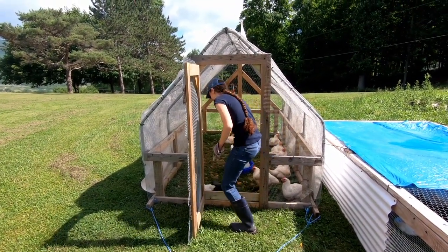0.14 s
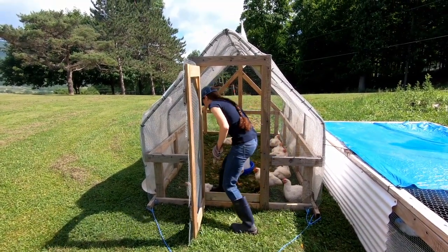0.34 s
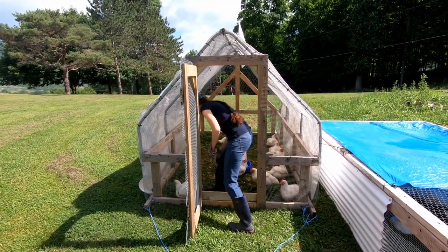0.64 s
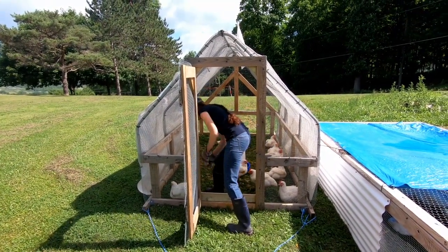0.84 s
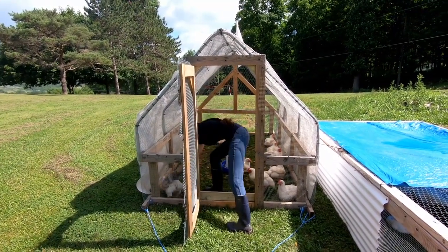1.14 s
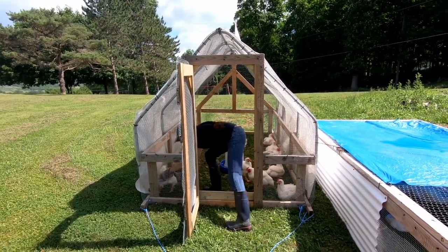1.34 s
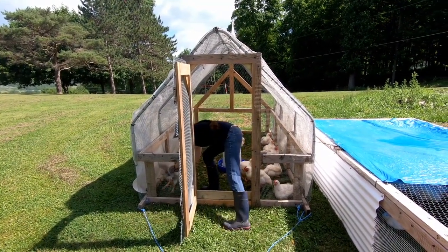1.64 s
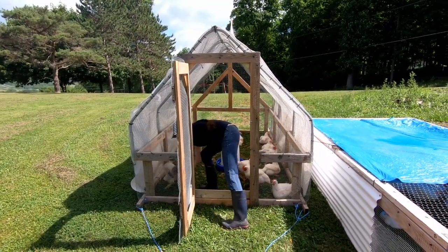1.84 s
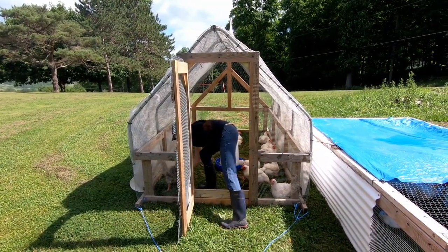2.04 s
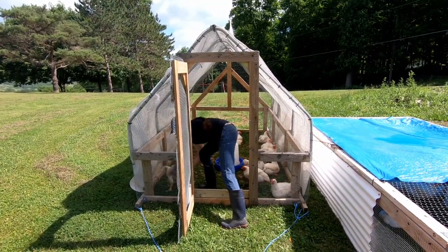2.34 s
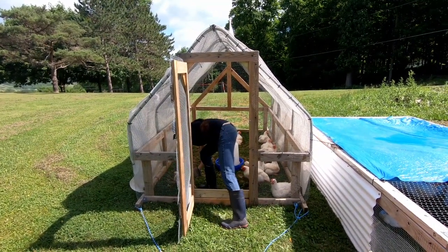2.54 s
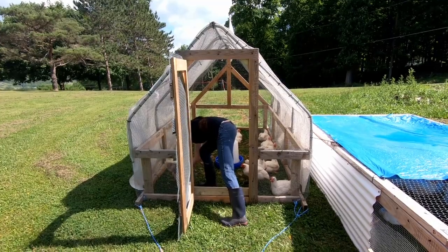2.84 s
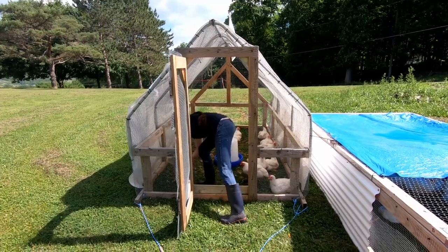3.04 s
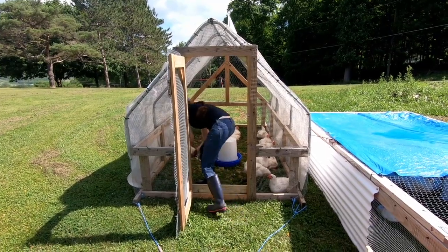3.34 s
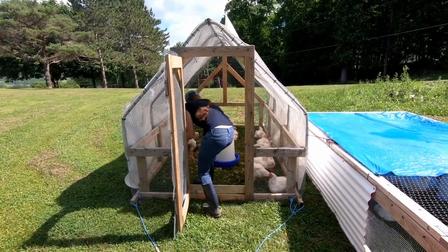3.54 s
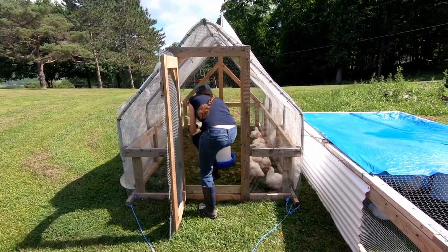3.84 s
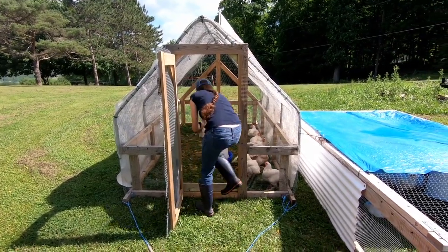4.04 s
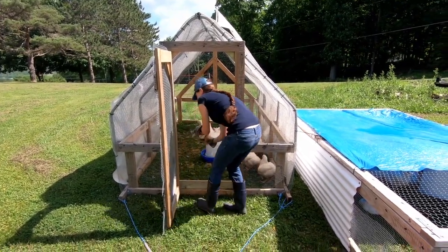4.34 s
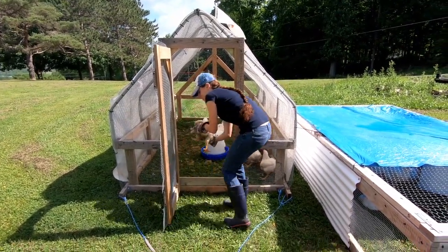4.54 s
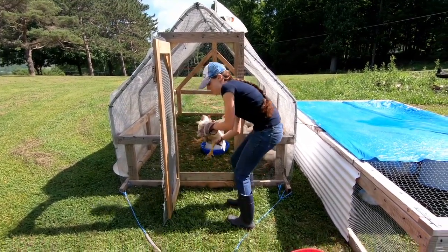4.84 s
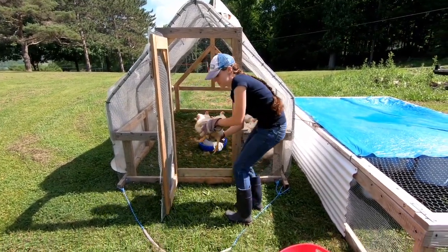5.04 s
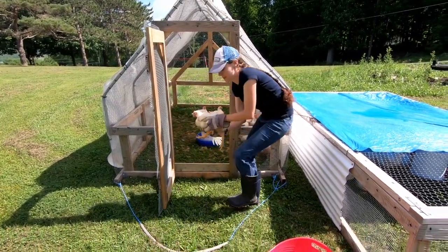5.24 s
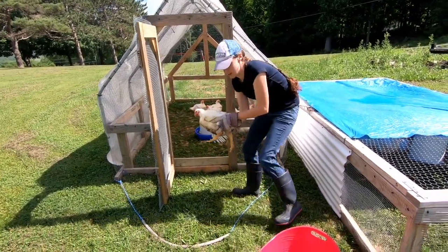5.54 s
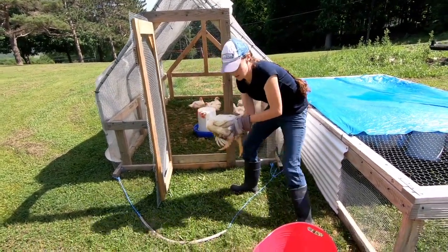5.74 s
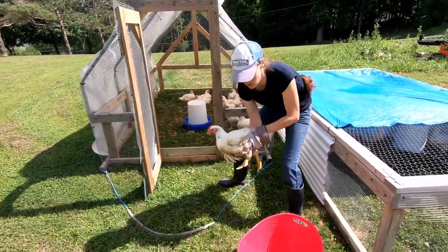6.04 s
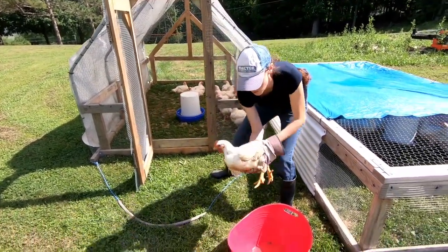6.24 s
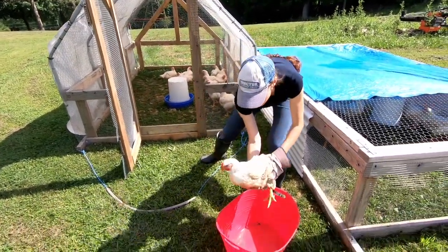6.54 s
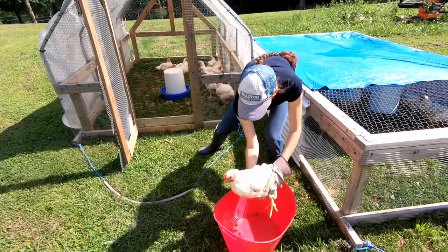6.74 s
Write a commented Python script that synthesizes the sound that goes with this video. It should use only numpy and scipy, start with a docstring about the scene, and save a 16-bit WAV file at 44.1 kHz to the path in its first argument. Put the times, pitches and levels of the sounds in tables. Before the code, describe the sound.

Outdoors by a pen, wind rumbles on the microphone over a few dull knocks and faint peeps. Then a nearby chicken starts squawking, hoarse and shrill, in rapid short cries while straw rustles. Past the middle it flaps briefly and a plastic feeder is bumped. The wind drops, the squawks grow louder and more spaced out, and a distant sparrow trills in the trees.

```python
"""Catching a chicken in a hoop pen.

On a lawn, close to the microphone, a young chicken is caught and carried out: the strained membranes
of its syrinx squawk harshly, its wings beat, straw rustles, boots and a feeder knock about.
Farther off the flock peeps and a sparrow trills in the trees.
A breeze buffets the microphone until it drops."""
import sys
import numpy as np
from scipy import signal
from scipy.fft import rfft, irfft, next_fast_len
from scipy.io import wavfile
from scipy.ndimage import uniform_filter1d, map_coordinates

SR = 44100
rng = np.random.default_rng(int(sys.argv[2]) if len(sys.argv) > 2 else 0)


def generate_wav(signal):
    """Clip the signal to [-1, 1] and save it as 16-bit WAV at the path in sys.argv[1]."""
    frames = np.transpose(np.atleast_2d(signal))
    scaled = np.clip(frames, -1, 1) * 32767
    pcm = np.round(scaled).astype(np.int16)
    wavfile.write(sys.argv[1], SR, pcm)


N = 304290
MID_HZ = 800  # the voice's resting pitch, at which the throat resonances are unstretched


def amp(db):
    return 10 ** (np.asarray(db) / 20)


def unit(x):
    return x / np.sqrt(np.mean(x ** 2) + 1e-20)


def along(points, hz):
    """Read (Hz, value) points on a log frequency axis."""
    freqs, values = np.transpose(points)
    return np.interp(np.log(hz + 1), np.log(freqs + 1), values)


def curve(points):
    """One value per sample from (s, value) points."""
    times, values = np.transpose(points)
    return np.interp(np.arange(N) / SR, times, values)


def wobble(rate):
    """A smooth random curve, rate knots a second."""
    return map_coordinates(rng.standard_normal(int(N * rate / SR) + 4), [np.arange(N) * rate / SR])


def filtered(x, response):
    """x times a response of frequency."""
    size = next_fast_len(N + SR // 2)
    return irfft(rfft(x, size) * response(np.fft.rfftfreq(size, 1 / SR)), size)[..., :N]


def coloured(x, points):
    """x through a spectrum of (Hz, dB) points."""
    return filtered(x, lambda hz: amp(along(points, hz)))


def noise(spectrum):
    """Noise of rms 1, coloured by (Hz, dB) points."""
    return unit(coloured(rng.standard_normal(N), spectrum))


def stereo_noise(spectrum, width):
    """Stereo noise of rms 1; width is side over mid."""
    mid, side = coloured(rng.standard_normal((2, N)), spectrum)
    return unit(np.array([mid + width * side, mid - width * side]))


def steady(x, size=400):
    """x with its running rms held at 1."""
    return x / np.sqrt(np.abs(uniform_filter1d(uniform_filter1d(x * x, size), size)) + 1e-12)


def add(track, start_s, sound):
    """Mix a sound into a track."""
    i = max(0, round(start_s * SR))
    track[i:i + len(sound)] += sound[:max(0, N - i)]


def bump(hz, centre_hz, width_hz):
    """A resonance peak of height 1."""
    return 1 / (1 + (2 * (hz - centre_hz) / width_hz) ** 2)


def patchy(x, depth_db, frames):
    """x with random patches of gain across time and frequency."""
    spectra = signal.stft(x, nperseg=512)[2]
    patches = uniform_filter1d(uniform_filter1d(rng.standard_normal(spectra.shape), 5, 0), frames, 1)
    return signal.istft(spectra * amp(depth_db * unit(patches)), nperseg=512)[1][:N]


def breeze(buffet_db, leaves_db, fade_db_per_s, lean_db):
    """Eddies hit each microphone port separately; far trees hiss, ever less as the breeze drops."""
    # strength of the gusts at the microphone: time_s, relative_db
    gusts = [(0.0, -29.5), (0.46, -25.5), (1.6, -20), (2.17, -27.5), (2.96, -26), (3.12, -39.5),
             (3.82, -24.5), (4.1, -38), (4.32, -35), (4.88, -94), (5.6, -48.5), (6.55, -39), (6.9, -48)]
    # spectrum of the wind on the ports: frequency_hz, gain_db
    rumble = [(20, -5.5), (48, 6), (90, 1.5), (150, -6.5), (220, -15.5), (390, -31), (650, -93)]
    # spectrum of the distant leaves: frequency_hz, gain_db
    hiss = [(200, 8.5), (450, -8), (800, -7), (1400, -6.5), (2700, -3), (4600, -11), (6000, -23),
            (11000, -38), (14000, -93)]
    eddies = amp(3.6 * np.array([wobble(22), wobble(22)]))
    buffet = amp(curve(gusts) + buffet_db) * unit(eddies * stereo_noise(rumble, width=.9))
    sway = amp(leaves_db - fade_db_per_s * np.arange(N) / SR + wobble(3.281))
    return buffet * amp([[lean_db], [-lean_db]]) + sway * stereo_noise(hiss, width=.34)


def flock(gain_db, waver):
    """Thin, wavering peeps of the other young birds, some way off."""
    # gliding peeps: start_s, length_s, start_hz, end_hz, relative_db
    peeps = [(0.457, 0.061, 2800, 2220, -58), (0.503, 0.026, 1400, 740, -51.5),
             (0.566, 0.016, 780, 1150, -51), (0.572, 0.062, 2350, 2100, -54), (.91, 0.11, 3130, 3560, -66),
             (1.036, 0.087, 3770, 3590, -60.5), (0.022, 0.0685, 2650, 2335, -54),
             (5.94, .068, 2284, 2136, -55.5), (6.618, 0.079, 2110, 2980, -60)]
    out = np.zeros(N)
    for start, length, start_hz, end_hz, db in peeps:
        progress = np.linspace(0, 1, int(length * SR))
        glide_hz = start_hz + (end_hz - start_hz) * np.sin(np.pi * progress / 2)
        hz = glide_hz * (1 + waver * wobble(400)[:len(progress)])
        swell = amp(db + gain_db) * np.sin(np.pi * progress)
        add(out, start, swell * np.sin(2 * np.pi * np.cumsum(hz) / SR))
    return out * amp(4 * wobble(120))


def sparrow(level_db):
    """One hooked whistle from the trees, repeated evenly and never quite alike."""
    # runs of the trill: start_s, end_s, interval_s
    trills = [(.073, .17, .091), (4.765, 5.96, .0567), (6.416, 6.89, .0587)]
    # shape of one whistle: from_centre_s, pitch_hz, relative_db
    note = [(-.018, 4700, -12.5), (-.013, 5800, -10), (-.006, 7460, -8.5), (-.002, 6030, 4),
            (.004, 5750, -21.5), (.016, 6330, -26)]
    offsets, hz, db = np.transpose(note)
    out, t = np.zeros(N), np.arange(offsets[0], offsets[-1], 1 / SR)
    for start, end, interval in trills:
        for centre in np.arange(start, end, interval):
            detune = 1 + .0035 * rng.normal()
            phase = 2 * np.pi * np.cumsum(np.interp(t, offsets, hz)) * detune / SR
            swell = amp(level_db + rng.normal() + np.interp(t, offsets, db))
            add(out, centre + offsets[0], swell * np.sin(phase))
    return out


def knocks(clack_t60, thud_t60):
    """Dull contacts of boots and wood on turf: a clack over a low thud."""
    # footfalls and bumps against the frame: start_s, clack_db, thud_db
    contacts = [(0.304, -44.5, -17.5), (0.513, -45.5, -28.5), (0.749, -39.5, -27.5), (2.182, -32, -31),
                (4.245, -57, -18.5), (4.43, -31, -29.5)]
    clack, thud, t = np.zeros(N), np.zeros(N), np.arange(SR // 4) / SR
    for start, clack_db, thud_db in contacts:
        add(clack, start, amp(clack_db - 60 * t / clack_t60) * np.minimum(t / .002, 1))
        add(thud, start, amp(thud_db - 60 * t / thud_t60) * (1 - np.exp(-t / .0045)))
    wood = noise([(200, 2), (1200, 12), (4000, 2), (12000, -47)])
    turf = noise([(60, -8), (200, 22.5), (600, -22), (2000, -58)])
    return clack * wood + thud * turf


def straw(crackle_db, crackle_rate):
    """Dry straw rustles in uneven spurts under the birds' feet."""
    # straw and feathers stirred in the struggle: start_s, length_s, level_db
    scuffles = [(1.144, 0.56, -35.5), (1.937, 0.062, -36), (3.895, 0.56, -32)]
    # spectrum of the rustle: frequency_hz, gain_db
    rustle = [(200, -9), (900, 4.5), (2800, 2.5), (5000, -8), (9500, -20.5), (14000, -64)]
    stir = np.zeros(N)
    for start, length, db in scuffles:
        add(stir, start, amp(db) * np.sin(np.linspace(0, np.pi, int(length * SR))))
    crackle = amp(crackle_db * wobble(crackle_rate))
    return stir * unit(crackle * noise(rustle))


def syllables(arch_hz=26.99, body_arch_db=8, rasp_arch_db=6.5, attack_share=.39, release_s=.021):
    """The voice's controls arch over each syllable; tension is the unbroken pitch in Hz."""
    # syllables, often a hoarse catch and then a voiced cry, with values at the crest: start_s, length_s,
    # crest_share, pitch_hz, glide_hz_per_s, bite_hz (a resonance), roughness, body_db, rasp_db
    calls = [(1.195, .055, 0.34, 905, -3, 3040, 1.2, -38.5, -32),
             (1.347, .17, 0.57, 927, -500, 3780, 0.65, -23, -31.5),
             (1.554, .155, 0.32, 875, -600, 3500, 0.68, -23.5, -18.5),
             (1.736, .115, 0.46, 817.3, -750, 4020, 0.29, -23, -19),
             (1.991, .18, 0.22, 793, -1100, 5990, 0.6, -27.5, -19),
             (2.259, .054, 0.41, 818, -600, 3000, 0.8, -26.5, -22),
             (2.321, .08, 0.41, 800.6, 1105, 3920, 0.51, -21.5, -17),
             (2.54, .061, 0.44, 771, 2, 2430, 0.79, -38.5, -27.5),
             (2.661, .09, 0.34, 681, -4000, 2180, 0.56, -25, -18.5),
             (2.861, .17, .15, 832.2, -1500, 2930, 0.69, -24.5, -19.5),
             (3.123, 0.028, 0.44, 791, 2, 1692, 0.99, -26.5, -30.5),
             (3.142, .089, 0.42, 821, -900, 2600, 0.93, -33, -28),
             (3.206, .14, .56, 768, -1100, 3190, 0.63, -22.5, -20.5),
             (3.458, 0.0878, 0.52, 810, 4, 2990, 0.83, -23.5, -26.5),
             (3.531, .1, 0.33, 819, -300, 3500, 0.99, -33.5, -34),
             (3.613, .15, 0.63, 734.3, -1100, 2180, 0.8, -24, -22),
             (3.961, .1, 0.46, 859, 7, 2500, 0.85, -32.5, -25),
             (4.079, .1, .52, 790, -300, 2250, .84, -29, -24),
             (4.19, 0.14, .5, 790, -1800, 3350, 0.72, -24, -25),
             (4.322, .06, 0.33, 693.6, -1, 3500, 0.69, -28.5, -48),
             (4.424, .061, 0.46, 646.2, 1105, 1870, 0.82, -36.5, -38.5),
             (4.491, .145, .36, 818.6, -200, 2500, 0.69, -25.5, -19),
             (4.626, .125, .62, 736, -1500, 2450, 0.77, -24, -20.5),
             (4.901, 0.0356, 0.37, 777, 1507.5, 1540, 0.77, -23.5, -29.5),
             (4.918, .088, 0.55, 585, -550, 3528, 0.27, -25, -19),
             (4.989, .095, 0.31, 739, -100, 2800, 0.39, -18, -18),
             (5.334, .099, 0.43, 809.7, -400, 2310, 0.82, -19.5, -26.5),
             (5.419, .135, 0.37, 787.3, -330, 1560, 0.49, -11.5, -26),
             (5.537, .045, 0.43, 995, -8000, 1010, 0.58, -30, -39),
             (5.99, 0.1146, 0.57, 798.7, -400, 2010, 0.76, -17.5, -22),
             (6.058, 0.3008, .58, 806, -74, 2040, 0.47, -11, -22.5),
             (6.342, .048, 0.34, 867, -500, 890, 0.52, -30.5, -35)]
    tension, bite = np.full((2, N), float(MID_HZ))
    sag, rough, effort, body, rasp = np.zeros((5, N))
    for start, length, crest, hz, glide, bite_hz, roughness, body_db, rasp_db in calls:
        t = np.arange(int(length * SR)) / SR
        span = slice(round(start * SR), round(start * SR) + len(t))
        past_crest = t / length - crest
        slack = (2 * past_crest) ** 2  # 1 at half a length from the crest
        tension[span] = hz + glide * length * past_crest - arch_hz * slack
        bite[span] = bite_hz * tension[span] / hz
        sag[span] = np.clip(past_crest / (1 - crest), 0, 1)
        # the membranes are least steady as they start and away from the crest
        rough[span] = np.clip(roughness * (1 - .3 * past_crest + .25 * slack), 0, 1)
        effort[span] = np.maximum(effort[span], np.sqrt(np.sin(np.pi * t / length)))
        opening = np.minimum(t / (attack_share * crest * length), 1)
        closing = np.minimum((length - t) / release_s, 1)
        add(body, start, opening * closing * amp(body_db - body_arch_db * slack))
        rasp_slack = (2 * (past_crest + .029)) ** 2  # the rasp crests a little earlier
        add(rasp, start, opening * closing ** 2 * amp(rasp_db - rasp_arch_db * rasp_slack))
    rough = np.abs(uniform_filter1d(rough, size=300))  # the membranes cannot change at once
    return tension, bite, sag, rough, effort, body, rasp


def voice_cracks(tension, rough, length_s=.036, rough_rise=.249):
    """Pitch and roughness jump where the voice cracks as the air runs out, and once as a scoop at the start of
    a call."""
    # cracks in the voice: start_s, jump_hz
    breaks = [(1.825, 131), (2.125, 330.3), (2.38, 69.9), (2.978, 219.8), (5.325, 328.9)]
    pitch, hoarse = tension.copy(), rough.copy()
    crack = np.clip(4 * np.sin(np.linspace(0, np.pi, int(length_s * SR))), 0, 1)
    for start, jump_hz in breaks:
        add(pitch, start, jump_hz * crack)
        add(hoarse, start, rough_rise * crack)
    return pitch, np.clip(hoarse, 0, 1)


def syrinx(pitch, rough, jitter, shake, flutter, db_per_octave, count=19):
    """A harmonic cry; under strain a slower membrane flutter adds sidebands, then it breaks into noise."""
    unsteady = 1 + jitter * rough ** 3 * wobble(220) + .022 * rough ** 1.5 * wobble(55)
    phase = 2 * np.pi * np.cumsum(pitch * unsteady) / SR
    beat = np.sin(phase / 4 + 2 * rough * wobble(90))  # flutter at a quarter of the pitch
    phase += rough * (shake * rough * wobble(500) + flutter * beat)
    harmonics = np.arange(1, count + 1)
    lag = rng.uniform(0, 2 * np.pi, (count, 1))  # ringing in the throat spreads each pulse
    cry = amp(db_per_octave * np.log2(harmonics)) @ np.cos(harmonics[:, None] * phase + lag)
    cry *= 1 + rough * (.75 * beat + .5 * wobble(350))
    puffs = rng.standard_normal(N) * (1 + np.cos(phase))
    air = coloured(puffs, [(2400, 0), (12800, -7)])
    return unit(cry) + rough ** 2 * unit(air)


def throat(source, tension, bite, sag, ring_db=7, sag_db=18, bite_db=5.5):
    """In the pen the resonances follow the tension; with the beak wide only the bite moves."""
    # throat colour in the pen: frequency_hz, gain_db
    penned = [(350, -27.5), (500, -24.5), (650, 9.5), (850, 4.5), (1150, -0.5), (1600, 3.5), (2000, -4),
              (2400, 5), (3200, 0), (4400, -13.5), (6600, -19), (8000, -25), (9800, -21.5), (12000, -40.5)]
    # throat colour held up with the beak wide: frequency_hz, gain_db
    wide = [(350, -18), (520, -9.5), (650, 2), (800, -3.5), (1050, -7), (1600, 11), (2000, 3), (3100, -2),
            (4000, -10), (5100, -10), (7200, -12), (8400, -20.5), (10200, -19.5), (12000, -44.5)]
    # how far the beak opens once the bird is held up: time_s, gape_share
    beak = [(4.6, 0.08), (5.35, 1)]
    hz, t, spectra = signal.stft(source, SR, nperseg=512, noverlap=384)
    hz = hz[:, None]
    controls = tension, bite, sag, np.clip(curve(beak), 0, 1)
    tension, bite, sag, gape = [np.interp(t, np.arange(N) / SR, c) for c in controls]
    stretched = hz * MID_HZ / tension
    narrow_db = along(penned, stretched) + ring_db * bump(stretched, 2410, 360)  # a piercing ring on top
    narrow_db += sag_db * sag * bump(hz, 1450, 190)  # opens as each syllable runs out
    colour_db = (1 - gape) * narrow_db + gape * along(wide, hz)
    colour_db += bite_db * bump(hz, bite, 350)  # shifts between syllables as the head turns
    return signal.istft(spectra * amp(colour_db), nperseg=512, noverlap=384)[1][:N]


def squawks(rasp_hz=1900, treble_hz=4400):
    """The caught bird: syrinx through throat, each syllable with its own swell and share of rasp."""
    # treble reaching the microphone as the bird is turned about, at full effort: time_s, gain_db
    turning = [(1.8, 3), (2.05, 12), (2.35, 0.5), (2.7, 14), (2.9, 3), (3.3, -1), (3.7, 10.5), (4.6, 8),
               (5, 2.5), (6.2, 3.5)]
    tension, bite, sag, rough, effort, body_gain, rasp_gain = syllables()
    pitch, rough = voice_cracks(tension, rough)
    source = syrinx(pitch, rough, jitter=.07, shake=.3, flutter=.4, db_per_octave=-3)
    voice = patchy(throat(source, tension, bite, sag), depth_db=2.6, frames=6)
    body = filtered(voice, lambda hz: 1 / (1 + (hz / rasp_hz) ** 16))
    rasp = steady(voice - body)
    treble = rasp - filtered(rasp, lambda hz: 1 / (1 + (hz / treble_hz) ** 20))
    rasp += (effort * amp(curve(turning)) - 1) * treble
    quaver = amp(2.6 * rough * wobble(100))
    return quaver * (body_gain * steady(body) + rasp_gain * rasp)


def feeder(start_s, hz, db, t60):
    """The hollow plastic feeder booms briefly when bumped."""
    out, t = np.zeros(N), np.arange(SR // 3) / SR
    swell = amp(db - 60 * t / t60) * (1 - np.exp(-t / .0084))
    add(out, start_s, swell * np.sin(2 * np.pi * hz * t))
    return out


def wings(start_s, interval_s, thump_hz, thump_db, feather_db, rise_s=.004, scatter_db=3.5, count=7):
    """One burst of wing beats, each a soft thump of air and a swish of feathers."""
    thumps, swish, t = np.zeros(N), np.zeros(N), np.arange(SR // 8) / SR
    swell = t / rise_s * np.exp(1 - t / rise_s)
    for beat_s in start_s + interval_s * np.arange(count):
        stroke = swell * amp(-scatter_db * rng.normal())
        hz = thump_hz * (1 + .083 * rng.normal())
        add(thumps, beat_s, amp(thump_db) * stroke * np.sin(2 * np.pi * hz * t))
        add(swish, beat_s, amp(feather_db) * stroke)
    return thumps + swish * noise([(100, 4.5), (900, 15), (4000, -15), (14000, -52)])


def near(x, width, cover_db, cover_t60):
    """A source just in front of the microphone; quick reflections off the pen's cover shift as it moves."""
    # imbalance of the two ports, negative to the right: frequency_hz, left_share
    lean = [(750, -0.06), (1500, -0.051)]
    t = np.arange(SR // 8) / SR
    echoes = rng.standard_normal((2, 2, len(t))) * amp(-60 * t / cover_t60) * (t > .002)
    echoes /= np.linalg.norm(echoes[0, 0])
    one, other = signal.fftconvolve(x[None, None], echoes, axes=2)[..., :N]
    turn = 2 * wobble(3)
    reflections = np.cos(turn) * one + np.sin(turn) * other

    def side_response(hz):
        return along(lean, hz) + 1j * width * (1 + (hz / 4000) ** 2) / (1 + (hz / 9000) ** 2)

    side = filtered(x, side_response)
    return np.array([x + side, x - side]) + amp(cover_db) * reflections


def yard(x):
    """Diffuse scatter from the pen and the trees, different at each port."""
    # decay of the yard's scatter: frequency_hz, t60_s
    decay = [(300, 0.53), (2000, 0.46), (10000, 1)]
    hz, t, spectra = signal.stft(rng.standard_normal((2, SR // 2)), SR, nperseg=256)
    tail = signal.istft(spectra * amp(-60 * t / along(decay, hz)[:, None]), SR, nperseg=256)[1]
    return signal.fftconvolve(x[None], tail / np.linalg.norm(tail[0]), axes=1)[:, :N]


def scene():
    """The struggle close up, the other birds across the yard, the wind right on the microphone."""
    struggle = squawks()
    struggle += wings(start_s=3.994, interval_s=.0422, thump_hz=314, thump_db=-23.5, feather_db=-28.5)
    struggle += knocks(clack_t60=.28, thud_t60=.15)
    struggle += feeder(start_s=3.94, hz=244.5, db=-21, t60=.28)
    struggle += straw(crackle_db=2.5, crackle_rate=290)
    others = flock(gain_db=14.5, waver=.027) + sparrow(level_db=-40)
    close = near(struggle, width=.2, cover_db=-10, cover_t60=.11)
    far = others + amp(-1.5) * yard(others)
    scatter = amp(-17) * yard(struggle)
    return close + scatter + far + breeze(buffet_db=3, leaves_db=-41.5, fade_db_per_s=.63, lean_db=1.5)


def record(dry):
    """The camera's microphone rounds off the highest peaks and keeps nothing above its band limit."""
    ceiling, top_hz = .9, 15200
    rounded = dry / (1 + np.abs(dry / ceiling) ** 8) ** (1 / 8)
    return filtered(rounded, lambda hz: hz < top_hz)


dry = scene()
out = record(dry)
generate_wav(out)
```